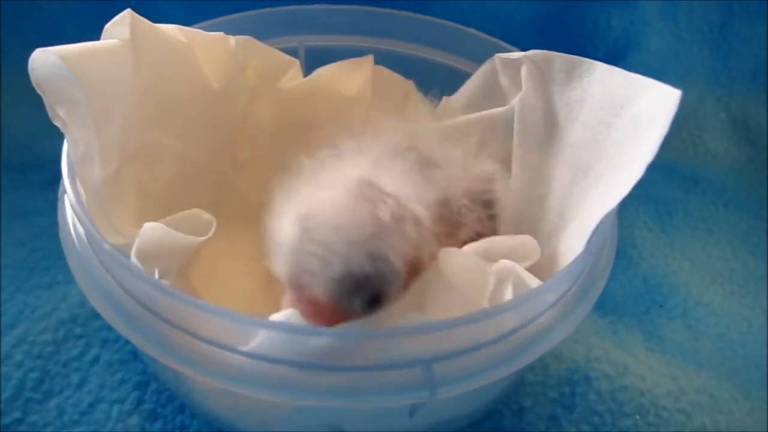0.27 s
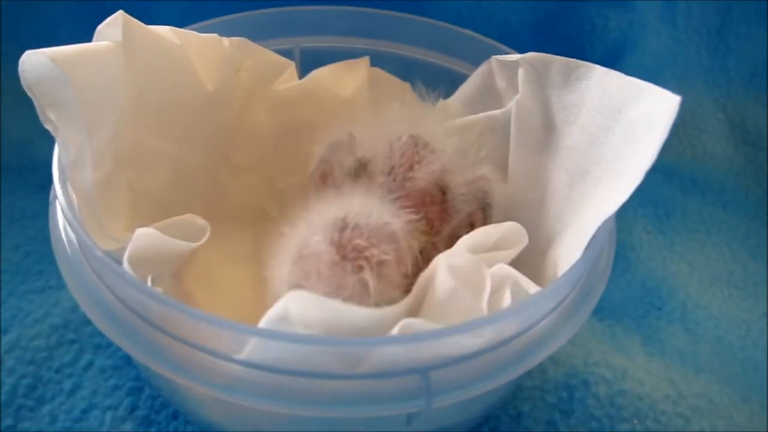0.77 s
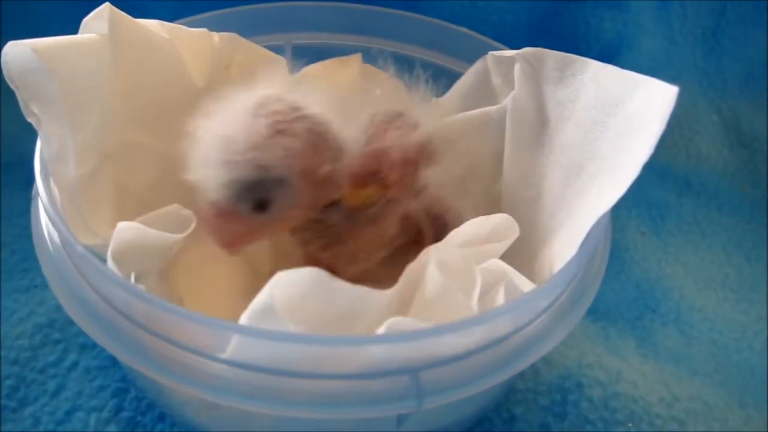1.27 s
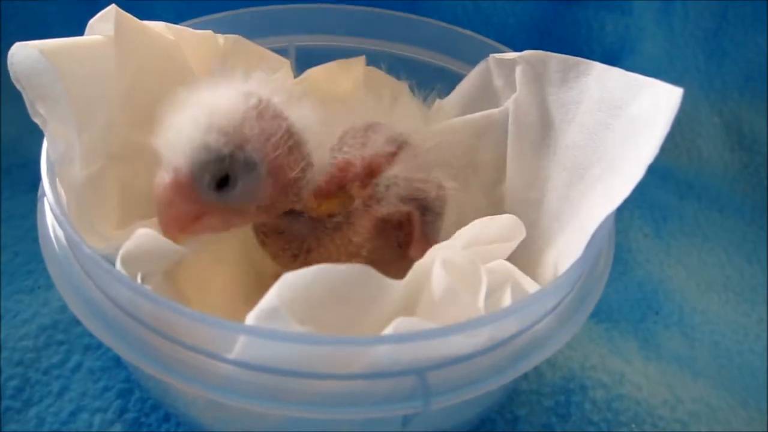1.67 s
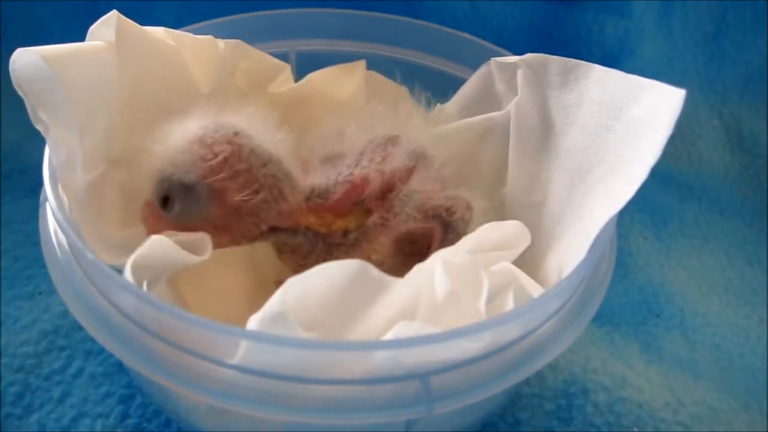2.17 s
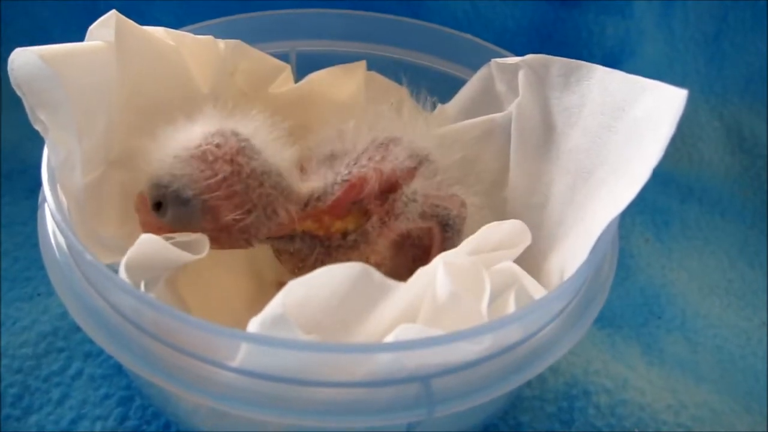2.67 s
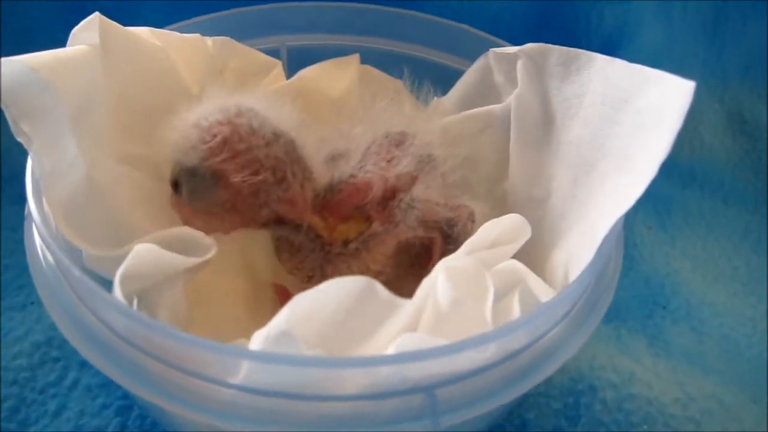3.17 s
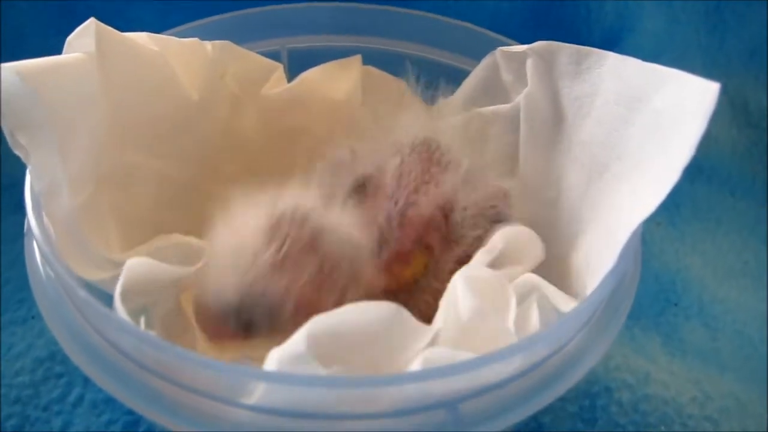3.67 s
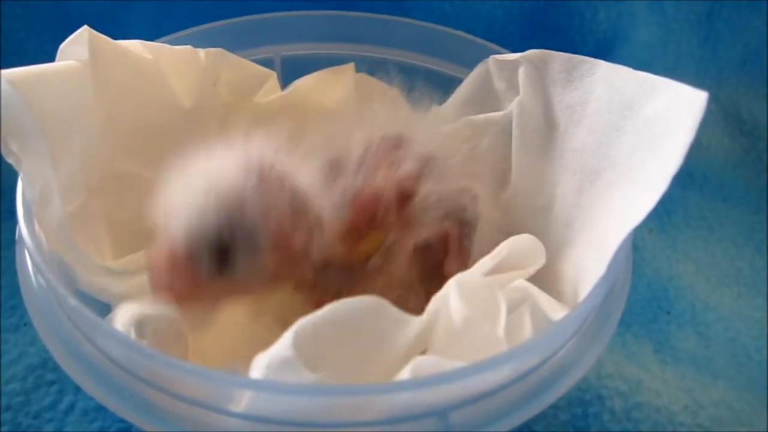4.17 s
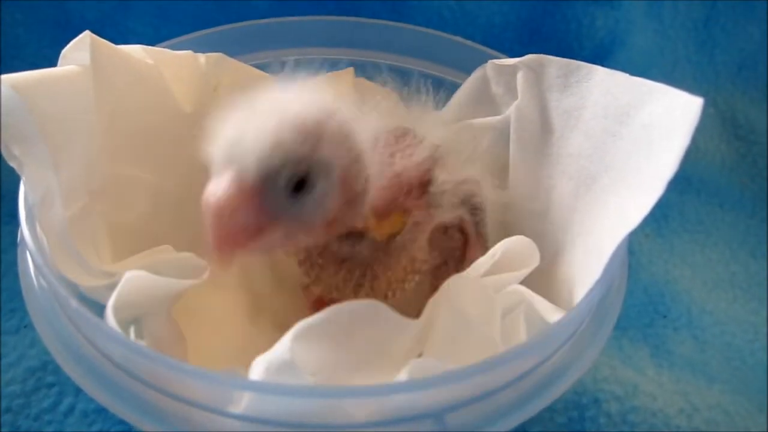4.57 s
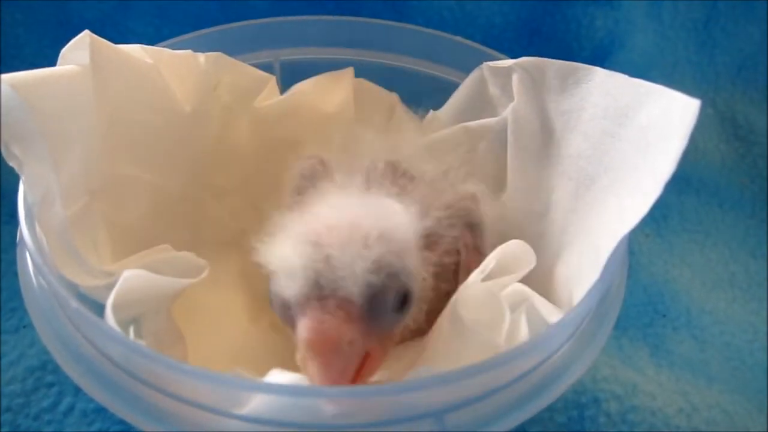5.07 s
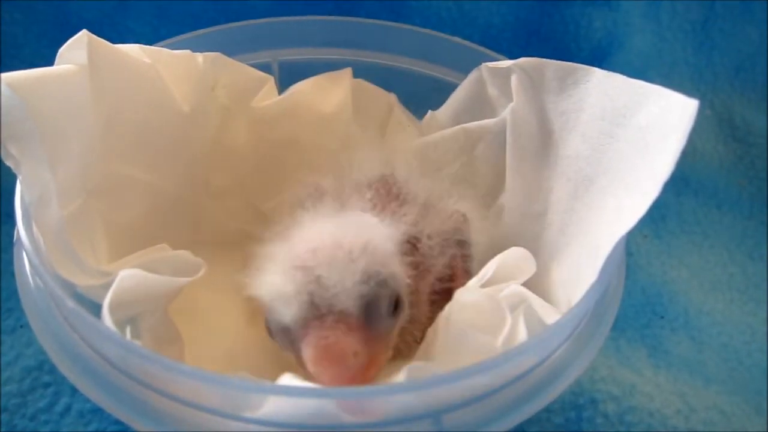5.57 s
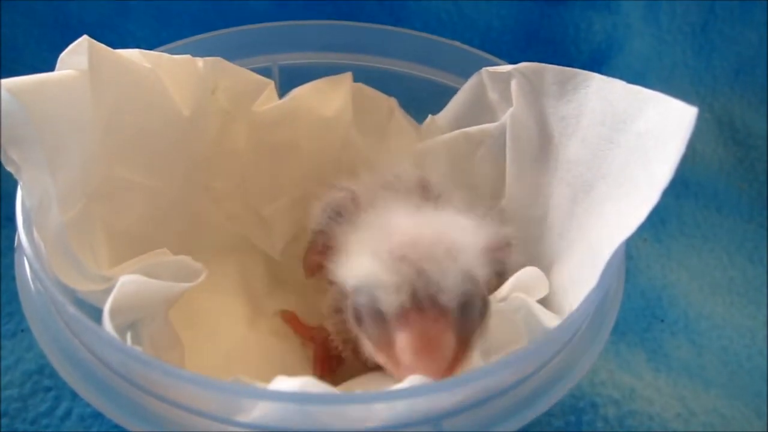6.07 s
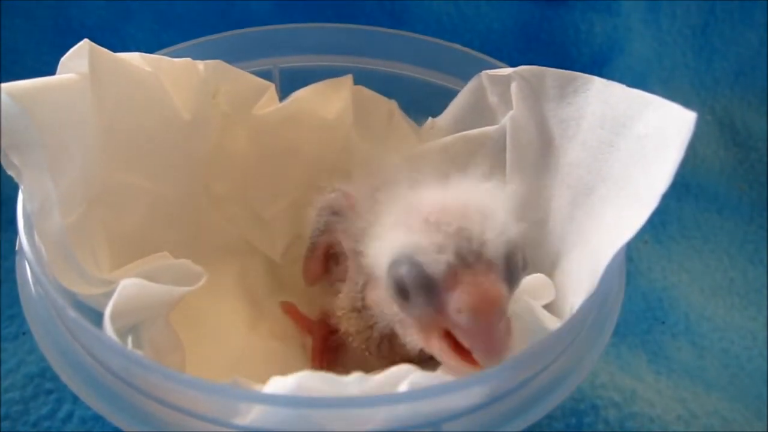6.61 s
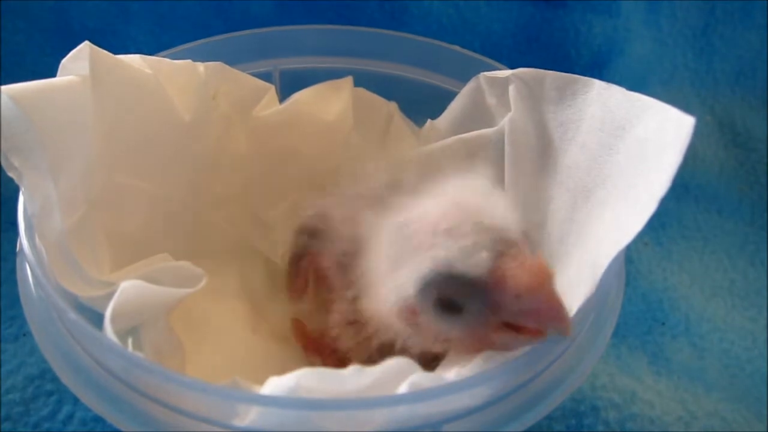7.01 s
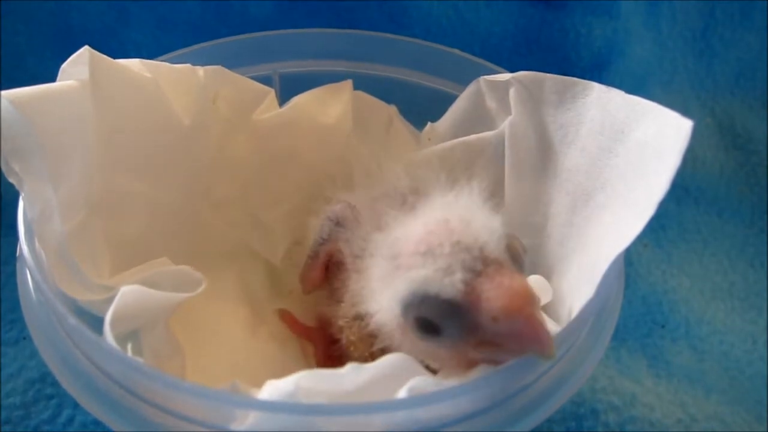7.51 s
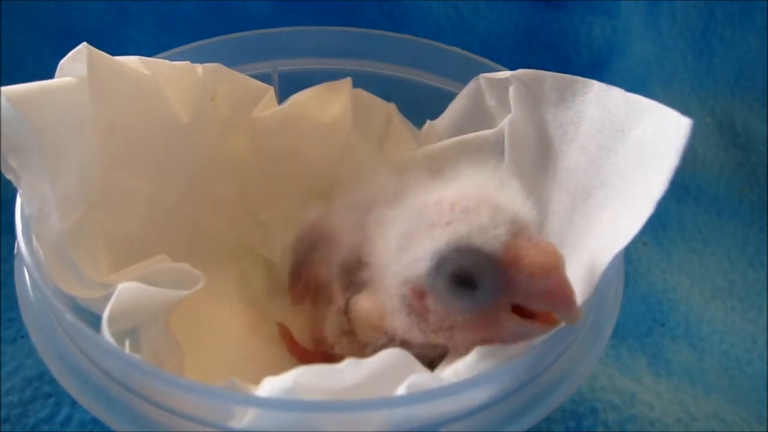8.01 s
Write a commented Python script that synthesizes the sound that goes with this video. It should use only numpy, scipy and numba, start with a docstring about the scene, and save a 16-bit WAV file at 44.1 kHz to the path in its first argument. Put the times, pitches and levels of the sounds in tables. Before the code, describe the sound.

A parrot chick close by gives quick groups of high whistled peeps, with long hoarse rasps between them, in a quiet humming room.

```python
"""In a quiet, humming room, a parrot chick in a plastic tub peeps in groups of three or four, close by.
Each peep is a stack of whistled partials whose pitch arches up, then turns rough as it falls.
Long hoarse rasps and faint trails, mostly between the groups, are narrow bands of noise over breath.
Soft knocks and two faint beak clicks are short decaying tones, the hum is coloured noise,
and the walls add a faint echo."""
import sys
import numpy as np
from scipy import signal
from scipy.fft import rfft, irfft
from scipy.io import wavfile
from scipy.ndimage import uniform_filter1d
from numba import njit

SR = 44100
rng = np.random.default_rng(int(sys.argv[2]) if len(sys.argv) > 2 else 0)


def wav_out(sig):
    """Save sig, one row per channel (or a flat mono array), as 16-bit PCM at SR to the path in sys.argv[1]."""
    wavfile.write(sys.argv[1], SR, np.round(np.clip(np.atleast_2d(sig).T, -1, 1) * 32767).astype(np.int16))


N = 363825  # samples

# Colour of the room hum: pitch_hz, relative level_db per Hz
HUM_COLOUR = [(15, -46), (25, -20.5), (297, -7.5), (631, -12), (722, -14.5), (1270, -16), (1530, -14),
              (2010, -19), (2770, -22), (3830, -17), (4380, -23), (13200, -32.5), (15500, -42)]
# Level of the hum as heard, drawn by hand, often lower after loud peeps:
# time_s, level_db before flicker and stereo difference
HUM_LEVEL = [(0.0, -50), (0.44, -53), (1.61, -44), (1.79, -52), (3.21, -48.5), (3.75, -53), (4.57, -49.5),
             (4.85, -58), (5.17, -59.5), (5.51, -56), (6.2, -51), (6.55, -58), (7.05, -59), (7.79, -48.5),
             (8.02, -56), (8.25, -62)]
# Soft knocks against the tub, and two faint beak clicks near 1 kHz:
# start_s, level_db (upper limit of the peak), pitch_hz
KNOCKS_AND_CLICKS = [(0.997, -39, 302), (1.369, -41, 637), (1.437, -41, 663), (1.464, -41, 724),
                     (3.179, -43, 330), (3.195, -36, 300), (3.223, -37, 387), (3.25, -35.5, 294),
                     (3.27, -38.5, 544), (3.299, -41, 327), (3.33, -43, 600), (3.389, -43, 320),
                     (3.873, -49, 1064), (5.351, -48.5, 1020), (5.463, -46.5, 330), (5.512, -42, 286),
                     (5.549, -44, 275)]
ROOM_T60_S, ROOM_DB, ROOM_HZ = .55, -27.5, 4500  # time to fade by 60 dB, echo level, low-pass corner

# One row a stretch of rasp or breath with a steady balance; some rows continue the same sound.
# The rows from 3.86 s and 5.35 s are faint hoarse trails after a peep, probably the room ringing on.
# Each row: (low_db, one_and_a_half_db, air_db, top_air_db), then its course.
# The four are relative levels: band at the pitch, at 1.54 x pitch, breath, treble breath.
# Course: time_s, pitch_hz, level_db (shared by all the layers)
RASPS = [ ((-7.5, -2.5, -16.5, -17.5), [(.8, 2400, -35), (.84, 2290, -40), (.9, 2330, -39),
         (1.09, 2170, -37.5), (1.14, 2200, -34), (1.3, 2290, -35), (1.39, 2270, -33.5), (1.71, 2210, -35.5),
         (1.76, 2020, -30)]), ((-4.5, -9, -5, -8.5), [(2.33, 2060, -34), (2.384, 2090, -25.5),
         (2.49, 1890, -35.5)]), ((-1.5, -5.5, -9, -16.5), [(2.51, 2100, -31.5), (2.562, 2270, -21),
         (2.658, 2080, -28.5), (2.748, 2260, -21), (2.85, 2274, -28), (2.97, 2240, -39.5),
         (3.12, 2260, -51)]), ((-11, 3.5, -10.5, -21), [(2.9, 2340, -45), (3.02, 2290, -40.5),
         (3.22, 2190, -37.5)]), ((-12, -20, -29, -15), [(3.86, 2330, -41), (3.98, 2350, -54),
         (4.1, 2264, -57)]), ((-1.5, -5.5, -11, -19), [(4.2, 1530, -64), (4.28, 1610, -43),
         (4.38, 1710, -41), (4.45, 1470, -43.5), (4.55, 1450, -56)]), ((18.5, 14, -5, -25),
         [(4.4, 1950, -71), (4.45, 1950, -54.5), (4.56, 1830, -68), (4.73, 1900, -73)]),
         ((-12, -16, -22, -36), [(5.35, 2200, -45), (5.384, 2160, -51), (5.41, 2220, -61)]),
         ((-41, -35, -13.5, -21.5), [(5.43, 2280, -51), (5.5, 2360, -46), (5.87, 2370, -40),
         (6.1, 2320, -40), (6.26, 2390, -39.5)]), ((-12.5, -6.5, -15, -16), [(6.665, 2450, -26.5),
         (6.78, 2470, -24.5), (6.9, 2606, -24), (7.0, 2550, -38), (7.07, 2560, -68)]),
         ((-7.5, -14.5, -12, -20.5), [(6.92, 2200, -29.5), (7.07, 2210, -26), (7.11, 2150, -24.5),
         (7.135, 2130, -27), (7.18, 2210, -20), (7.29, 2136, -20), (7.42, 2080, -19), (7.6, 1986, -19),
         (7.77, 1820, -19), (7.93, 1846, -18.5)]), ]
# Base widths_hz of the noise bands at 1, 1.54, 2 and 3 x pitch, before the blur factor
RASP_WIDTH_HZ = 175., 300., 310., 500.
# Blur stretch by stretch: width_factor; breathy ones blur, hoarse ones sharpen
RASP_BLUR = [1.9, 1.3, .72, 1.1, .9, 1.2, 1.6, 1.8, 1.6, .45, .88]
RASP_FADE_S = .02
# Colour of the breath: pitch_hz, relative level_db per Hz
BREATH_COLOUR = [(530, -55), (900, -46), (1590, -7), (3500, -3), (4530, -2.5), (5510, -0.5), (7600, -13),
                 (9880, -58), (16700, -120)]
# Colour of the treble breath: pitch_hz, relative level_db per Hz
TREBLE_BREATH_COLOUR = [(5180, -33), (8800, -5), (10100, 1.5), (14000, -23), (14800, -25), (15600, -63)]
# Breath wherever no stretch of RASPS sounds: time_s, level_db before the stereo spread
BETWEEN = [(.2, -43), (.66, -46), (1.88, -34.5), (2.2, -35.5), (3.35, -32.5), (3.7, -44.5), (4.87, -83),
           (5.2, -80), (6.4, -46), (6.55, -64), (8.04, -30.5), (8.2, -32)]

# One row a peep: start_s, length_s, pitch_hz (mid-arch guide), lean and bow of the arch (per length),
# rise and turn (rise time and start of the fall, as shares of length), level_db,
# onset_db and ending_db (relative to level_db, scaled below), second_db (overtones), half_db (half-pitch lines)
PEEPS = [(0.206, 0.095, 2586, 0.2, -0.048, 0.047, 0.75, -11, -2.5, -8.5, -3, -16.5),
         (0.344, 0.092, 2793, -0.0034, 0.58, 0.046, 0.85, -10.5, -2.5, -7.5, 0.5, -22),
         (0.501, 0.095, 2703, -0.033, 0.43, 0.057, 0.78, -10, -5, -10, -1.5, -33),
         (0.685, 0.092, 2550, -0.061, 0.16, 0.084, 0.88, -11.5, -4.5, -7.5, -3, -28),
         (1.77, 0.084, 2472, 0.11, 0.79, 0.023, 0.8, -13, 0.0, -4, -1, -22),
         (1.9, 0.089, 2645, 0.0065, 0.84, 0.052, 0.9, -11.5, -3, -5, 0, -26),
         (2.048, 0.088, 2506, -0.0062, 0.72, 0.048, 0.88, -14, -2.5, -2.5, -0.5, -30),
         (2.223, 0.084, 2408, -0.04, 0.2, 0.1, 0.84, -11, -4, -6.5, 1, -29),
         (3.233, 0.084, 2500, 0.19, 0.56, 0.052, 0.9, -8.5, -5.5, -5.5, -1, -30),
         (3.368, 0.084, 2684, -0.02, 0.66, 0.082, 0.93, -8, -6, -11.5, 1, -45),
         (3.522, 0.081, 2455, -0.045, 0.76, 0.05, 0.83, -10, -6, -10.5, -3.5, -35),
         (3.73, 0.099, 2385, -0.17, -0.078, 0.11, 0.93, -13, -1.0, -4.5, -3, -25.5),
         (4.737, 0.096, 2337, 0.07, 0.18, 0.054, 0.77, -15.5, 2.0, -3, 0, -15),
         (4.877, 0.093, 2438, -0.087, 0.74, 0.055, 0.84, -8.5, -6, -12.5, 3.5, -18),
         (5.029, 0.088, 2344, -0.15, 0.29, 0.075, 0.83, -12.5, -4, -5.5, 2, -24),
         (5.219, 0.09, 2249, -0.19, 0.024, 0.09, 0.88, -12, -4, -8, 0, -13.5),
         (6.266, 0.094, 2435, 0.2, 0.36, 0.058, 0.91, -11.5, -0.5, -3, 0, -18.5),
         (6.413, 0.089, 2682, -0.011, 0.72, 0.044, 0.86, -9, -2.5, -9.5, 3, -23),
         (6.565, 0.085, 2610, 0.012, 0.79, 0.05, 0.87, -8.5, -4.5, -9.5, 3, -30),
         (6.786, 0.1, 2274, -0.077, 0.29, 0.08, 0.96, -12, -1.5, -7.5, 1, -32),
         (7.929, 0.086, 2250, 0.051, 0.71, 0.036, 0.88, -13, 0, -5, 1.5, -27),
         (8.063, 0.091, 2427, -0.12, 0.0052, 0.12, 0.79, -10.5, -3.5, -9, 4, -23),
         (8.215, 0.074, 2340, -0.0091, 0.7, 0.06, 0.8, -12.5, -3.5, -7, 3.5, -19)]
# Start of a peep: share_of_length, level_db relative to onset_db
LEVEL_IN = [(-.045, -47), (0.005, -13.5)]
# End of a peep: share_of_length, level_db relative to ending_db
LEVEL_OUT = [(1.08, -19.5), (1.18, -18.5), (1.27, -44)]
# Attack: share_of_length, factor on onset_db
ATTACK = [(.1, 2.5), (.22, 1.17), (.42, 0.48)]
# Release: share_of_length, factor on ending_db
RELEASE = [(.65, 0.4), (.85, 0.67), (0.997, 1)]
# Unevenness of the membrane: share_of_length, pitch_scatter (fraction of the pitch)
ROUGH = [(0, .06), (.1, .004), (.8, .004), (.93, .03), (1.05, .12)]
# Colour the beak gives voice and air: pitch_hz, relative level_db
BEAK_COLOUR = [(800, -55), (1000, -23), (1170, 10.5), (1560, -14.5), (2400, 4.5), (3500, 5.5), (5000, 7),
               (6800, 3.5), (9500, -2.5), (12000, -0.5), (15500, -14.5)]
# The head turns and dips into the tub: time_s, left_delay_us, upper_pan_db (left minus right of
# partials 3 and 4), top_db (partials above 4), slack_db (extra level where the pitch is low)
HEAD = [(.2, -2, 10, 2, 1), (.7, -17, 0.5, -8, -1.1), (1.77, -68, 9, -5.5, -1),
        (2.23, -53.5, 3.5, -10, 1.5), (3.23, -70, 6.5, -0.2, 6.5), (3.37, -22, 2, -2.5, 6.5),
        (3.73, -23, 3.5, -2.5, 1.5), (4.74, -20, 2.5, 0.3, -4.5), (4.88, -7, 1.2, 2.8, -3.5),
        (5.22, -9, 3, 0, -2.5), (6.27, -14, 1, -0.5, 2.5), (6.57, 8, .1, 3, -2.5), (6.79, 4, -1, -1, -0.7),
        (7.93, 28, -2.5, -1.5, -3), (8.22, 30, -4, -1.5, -2.5)]
# Left minus right, for partials that reach 2300 Hz: dB with the head centred, dB per microsecond of delay
LOW_PAN_DB, SECOND_PAN_DB = (-4.5, -0.1279), (-3, 0.02)
SLACK_HZ = 1149  # pitch of the slack membrane
ARCH_MIDDLE, TIGHTENS_AT, SLACK_AT = .55, 0.049, 1.05  # shares of the length
FALL_POWER = 1.2  # shape of the fall
KICK, KICK_WIDTH = 0.135, 0.0786  # upward jerk: pitch gain per unit of lean, share of the length
UPPER_DB = -0.22  # third and fourth partial against the second
AIR_DB, AIR_DB_PER_HALF_DB, USUAL_HALF_DB = -25, .5, -26  # air grows with the half-pitch lines

NOTCH_HZ, NOTCH_WIDTH_HZ, TOP_HZ = 8220, 1150, 15620  # cancelled band, upper limit

LEFT_RIGHT = np.array([[1], [-1]])  # opposite signs on the two sides


def undb(db):
    """Turn decibels into gain."""
    return 10 ** (np.asarray(db) / 20)


def unit(x):
    """Scale to an rms of 1."""
    return x / np.sqrt(np.mean(x ** 2))


def colour_db(table, hz):
    """Read a colour table on a log-frequency axis."""
    table_hz, db = np.transpose(table)
    return np.interp(np.log(np.maximum(hz, 1)), np.log(table_hz), db)


def hiss(table):
    """Make noise with the spectrum of a colour table, rms 1."""
    hz = np.fft.rfftfreq(N, 1 / SR)
    spectrum = rfft(rng.standard_normal(N))
    return unit(irfft(spectrum * undb(colour_db(table, hz)), N))


def wobble(rate_hz):
    """Make a smooth random drift that changes about rate_hz times a second, rms 1."""
    k = max(int(SR / rate_hz), 1)
    smooth = uniform_filter1d(rng.standard_normal(N), k)
    return unit(uniform_filter1d(smooth, k))


def sides(x, pan_db):
    """Place a sound between left and right by a level difference."""
    return x * undb(np.array([pan_db, -pan_db]) / 2).reshape(2, -1)


@njit
def band(x, hz, width):
    """Resonate at a moving centre and width, with gain 1 at the centre (state-variable filter)."""
    y, b, l = np.empty(len(x)), 0., 0.  # output, band state, low state
    for i in range(len(x)):
        g, k = np.tan(np.pi * hz[i] / SR), width[i] / hz[i]
        v = (b + g * (x[i] - l)) / (1 + g * (g + k))
        b, l, y[i] = 2 * v - b, l + 2 * g * v, k * v
    return y


def highpass(x, order, hz):
    """Weaken everything below hz."""
    return signal.sosfilt(signal.butter(order, hz, "high", fs=SR, output="sos"), x)


def hum():
    """Room noise, alike on both sides in the bass and less related in the treble."""
    mid, side = hiss(HUM_COLOUR), hiss(HUM_COLOUR)
    side = highpass(side, 1, 1200) + 0.53 * side + .5 * uniform_filter1d(side, size=300)
    flicker_db = 1.0 * wobble(14)
    level_db = np.interp(np.arange(N) / SR, *np.transpose(HUM_LEVEL)) + flicker_db
    return undb(level_db) * (mid + 0.4 * side * LEFT_RIGHT)


def room(x):
    """Walls return a faint dull tail, partly different on each side."""
    t = np.arange(SR) / SR
    fade = np.exp(-np.log(1000) * t / ROOM_T60_S)
    tail = rng.standard_normal((2, SR)) * fade * (t > .004)
    tail = tail + 0.15 * tail[::-1]  # the close microphone ports share some of it
    tail = signal.sosfilt(signal.butter(1, ROOM_HZ, fs=SR, output="sos"), tail)
    tail = tail / np.sqrt(np.sum(tail ** 2, axis=1, keepdims=True))
    mono = x.mean(axis=0, keepdims=True)
    return undb(ROOM_DB) * signal.fftconvolve(mono, tail, axes=1)[:, :N]


def knocks_and_clicks():
    """Each soft knock on the tub or beak click is a tone that starts fast and dies away in a moment."""
    out, t = np.zeros(N), np.arange(SR // 10) / SR
    push = (1 - np.exp(-t / 0.00043)) * np.exp(-t / 0.011)
    for start_s, level_db, pitch_hz in KNOCKS_AND_CLICKS:
        i = int(start_s * SR)
        out[i:i + len(t)] += undb(level_db) * np.sin(2 * np.pi * pitch_hz * t) * push / push.max()
    return out


def rasp_tone(hz, width_hz):
    """Noise narrowed by two resonances round a hoarse pitch, rms 1."""
    width = np.full(len(hz), width_hz)
    narrow = band(rng.standard_normal(len(hz)), hz, width)
    return unit(band(narrow, hz, 3 * width))


def rasps():
    """Rasps (air tearing past the slack membrane) and faint hoarse trails: noisy bands over breath."""
    t, out, busy = np.arange(N) / SR, np.zeros((2, N)), np.zeros(N)
    tremble = np.sin(2 * np.pi * 7.2 * t + 1.0 * wobble(1.25))  # the body shivers
    burst_db = 1.3 * wobble(75) + .7 * wobble(28) + 1.1 * tremble
    surge_db = 1.1 * np.array([wobble(40) for _ in RASP_WIDTH_HZ])  # each band on its own
    breath = [hiss(BREATH_COLOUR), hiss(BREATH_COLOUR)]
    treble = [hiss(TREBLE_BREATH_COLOUR), hiss(TREBLE_BREATH_COLOUR)]
    # left and right gains of two independent noises
    spread = (0.87 * np.array([[0.9], [0.72]]), 0.57 * np.array([[0.88], [-1.2]]))

    for (balance, course), blur in zip(RASPS, RASP_BLUR):
        low_db, one_and_a_half_db, air_db, top_air_db = balance
        time_s, pitch_hz, level_db = np.transpose(course)
        i = np.arange(int((time_s[0] - RASP_FADE_S) * SR), int((time_s[-1] + RASP_FADE_S) * SR))
        from_edge_s = np.minimum(t[i] - t[i[0]], t[i[-1]] - t[i])
        fade = np.clip(from_edge_s / RASP_FADE_S, 0, 1)
        hz = np.interp(t[i], time_s, pitch_hz)
        gain = fade * undb(np.interp(t[i], time_s, level_db))
        # blurred stretches burst and surge less
        bursts = undb(burst_db[i] / max(blur, .8) ** .7)
        surges = undb(surge_db[:, i] / max(blur, .8))
        bands_db = (low_db, one_and_a_half_db, 0, air_db + 1.5)
        layers = list(zip((1, 1.54, 2, 3), bands_db, RASP_WIDTH_HZ, surges))
        for side, wide, high in zip(spread, breath, treble):
            bands = 0
            for multiple, db, width_hz, surge in layers:
                bands = bands + undb(db - 2.5) * surge * rasp_tone(multiple * hz, width_hz * blur)
            # strong bands carry a broad skirt, so the breath has a lowest level
            air = undb(max(air_db + 2.0, -12)) * wide[i] + undb(top_air_db) * high[i]
            out[:, i] += side * gain * (bands * bursts + air * bursts ** .5)
        busy[i] = np.maximum(busy[i], fade)

    between = (t > BETWEEN[0][0]) * (1 - busy) * undb(np.interp(t, *np.transpose(BETWEEN)))
    out += between * sum(side * (wide + 0.18 * high) for side, wide, high in zip(spread, breath, treble))
    return sides(out, -1.4)


def arch(share, top_hz, lean, bow, rise, turn):
    """Pitch of a peep: quick rise from slack, bowed plateau, fall back to slack."""
    from_middle = share - ARCH_MIDDLE
    tight_hz = top_hz * (1 + lean * from_middle - bow * from_middle ** 2)
    # a climbing peep jerks up before it falls
    jerk = np.exp(-((share - turn) / KICK_WIDTH + 1.8) ** 2) - .3
    tight_hz = tight_hz * (1 + KICK * max(lean, 0) * jerk)
    up = 1 - np.exp(-np.maximum(share - TIGHTENS_AT, 0) / rise)
    down = 1 - np.clip((share - turn) / (SLACK_AT - turn), 0, 1) ** FALL_POWER
    return uniform_filter1d(SLACK_HZ + (tight_hz - SLACK_HZ) * up * down, size=242, mode="nearest")


def swell(share, onset_db, ending_db):
    """Level of a peep in dB: attack, hold, release."""
    points = [(s, onset_db + db) for s, db in LEVEL_IN]
    points += [(s, factor * onset_db) for s, factor in ATTACK]
    points += [(s, factor * ending_db) for s, factor in RELEASE]
    points += [(s, ending_db + db) for s, db in LEVEL_OUT]
    return np.interp(share, *np.transpose(points))


def peeps():
    """The voice membrane tightens and slackens once a peep; slack, it beats unevenly."""
    out, scatter, shimmer = np.zeros((2, N)), wobble(1180), wobble(450)
    patchy, gusts_db = wobble(200), 3.5 * wobble(70)
    breath = highpass([hiss(BEAK_COLOUR), hiss(BEAK_COLOUR)], 4, 2100)
    head_s, *head_columns = np.transpose(HEAD)
    for (start_s, length_s, top_hz, lean, bow, rise, turn,
         level_db, onset_db, ending_db, second_db, half_db) in PEEPS:
        late_us, upper_pan_db, top_db, slack_db = (np.interp(start_s, head_s, c) for c in head_columns)
        pan_db = [centre + slope * late_us for centre, slope in (LOW_PAN_DB, SECOND_PAN_DB)]
        pan_db.append(upper_pan_db)
        upper_db = second_db + UPPER_DB
        partials_db = [0, second_db, upper_db, upper_db, top_db]

        first, last = int((start_s - .06 * length_s) * SR), int((start_s + 1.5 * length_s) * SR)
        i = np.arange(first, min(last, N))
        share = (i / SR - start_s) / length_s
        hz = arch(share, top_hz, lean, bow, rise, turn)
        slackness = np.clip((1600 - hz) / 300, 0, 1)
        gain = undb(level_db + swell(share, onset_db, ending_db) + slack_db * slackness)
        rough = np.interp(share, *np.transpose(ROUGH))
        phase = 2 * np.pi * np.cumsum(hz * (1 + rough * scatter[i])) / SR

        voice, power = 0, 0
        for k in np.arange(2, 28) / 2:  # partials and the half-pitch lines between them
            whole = int(np.ceil(k))
            is_half = k != whole
            db = colour_db(BEAK_COLOUR, k * hz) + partials_db[min(whole, 5) - 1] - 0.99 * max(k - 3, 0)
            # every other beat is weaker once the membrane is tight: lines at half pitch
            away_from_middle = np.clip(abs(share - .52) / .15 - 1.5, 0, 1)
            db = db + is_half * (half_db - 30 * away_from_middle)
            # half lines come and go
            size = undb(db) * (k * hz < SR * .4) * (patchy[i] if is_half else 1)
            lag = LEFT_RIGHT * np.pi * k * hz * late_us / 1e6  # half the delay on each side
            # long waves bend round the head and tub, so low pitches sit nearer the middle
            pan_index = min(whole, 3) - 1 if whole < 5 else 0
            pan = pan_db[pan_index] * np.minimum(k * hz / 2300, 1) ** 2
            voice = voice - sides(size * np.cos(k * phase - lag + 0.466 * k * k), pan)
            power = power + size ** 2 / 2

        air_db = AIR_DB + gusts_db[i] + 170 * rough + AIR_DB_PER_HALF_DB * (half_db - USUAL_HALF_DB)
        air = undb(air_db) * (1.88 * breath[0, i] + .5 * breath[1, i] * LEFT_RIGHT)
        out[:, i] += gain * undb(0.77 * shimmer[i]) * (voice / np.sqrt(power) + air)
    return out


def scene():
    """Chick, its echo, the knocks and clicks, and the room hum."""
    chick = peeps() + rasps()
    return chick + room(chick) + knocks_and_clicks() + hum()


def record(dry):
    """The microphone housing cancels a narrow band; the top is cut steeply."""
    edges_hz = [NOTCH_HZ - NOTCH_WIDTH_HZ / 2, NOTCH_HZ + NOTCH_WIDTH_HZ / 2]
    notch = signal.butter(2, edges_hz, "bandstop", fs=SR, output="sos")
    top_cut = signal.ellip(12, .2, 80, TOP_HZ, fs=SR, output="sos")
    return signal.sosfilt(top_cut, signal.sosfilt(notch, dry))


dry = scene()
out = record(dry)
wav_out(out)
```